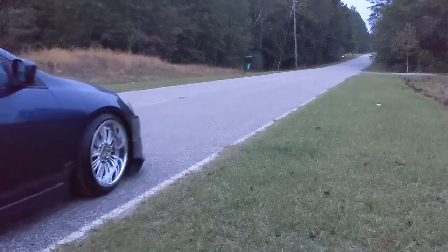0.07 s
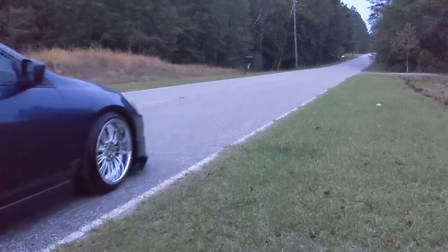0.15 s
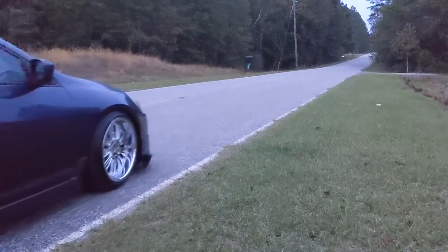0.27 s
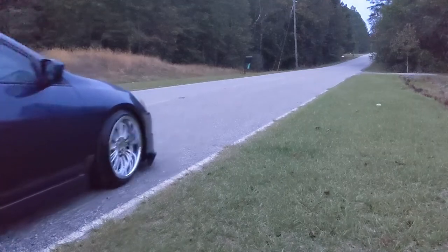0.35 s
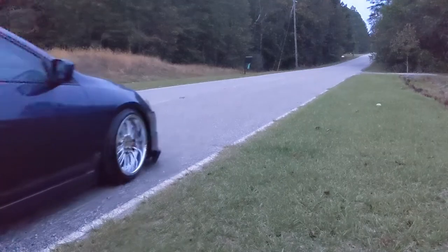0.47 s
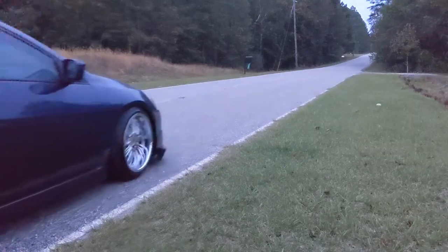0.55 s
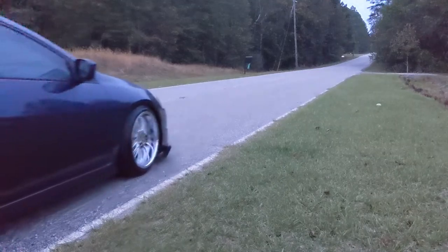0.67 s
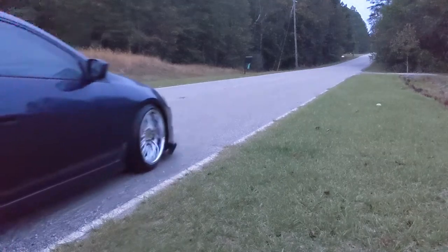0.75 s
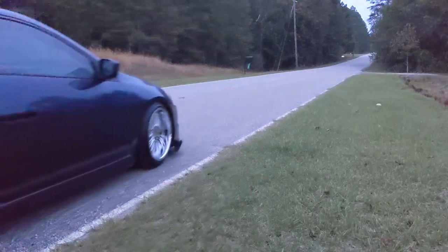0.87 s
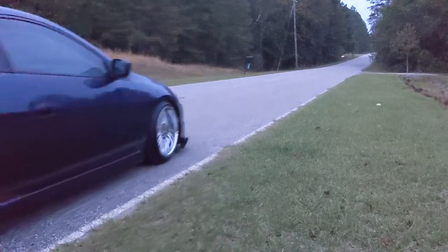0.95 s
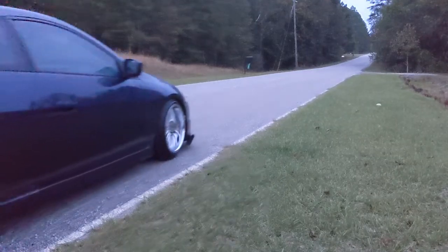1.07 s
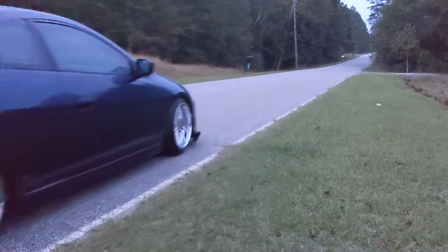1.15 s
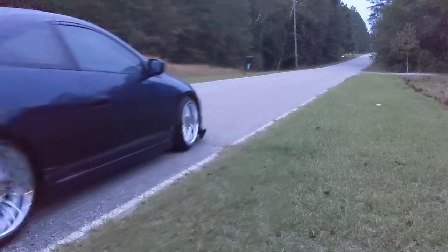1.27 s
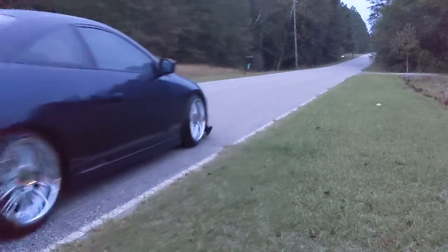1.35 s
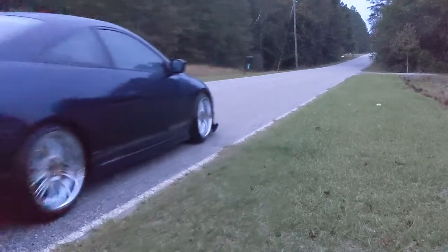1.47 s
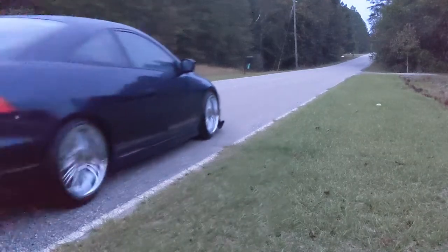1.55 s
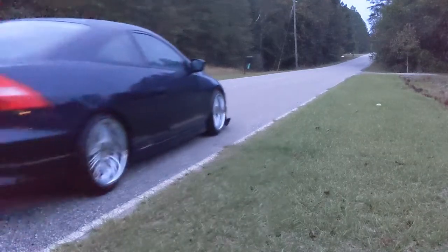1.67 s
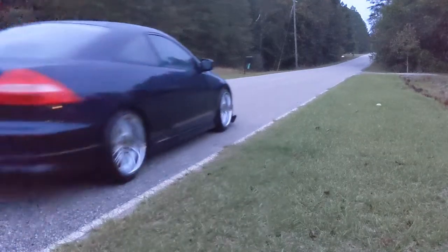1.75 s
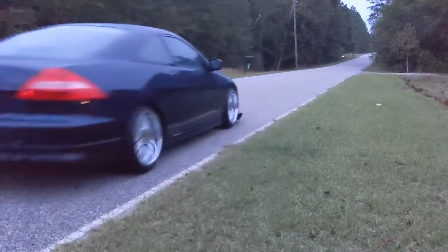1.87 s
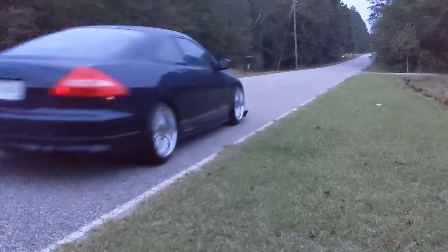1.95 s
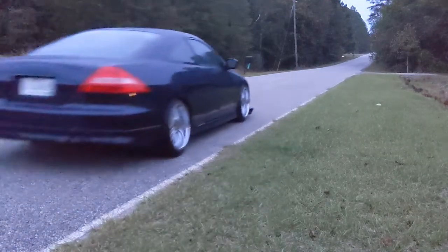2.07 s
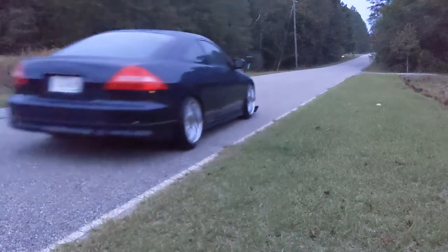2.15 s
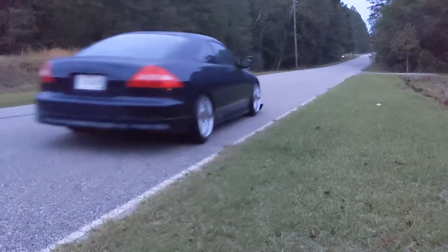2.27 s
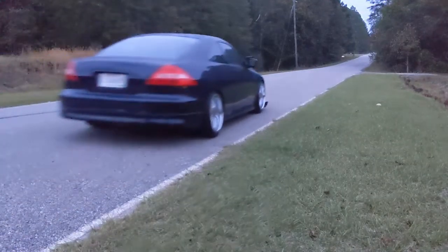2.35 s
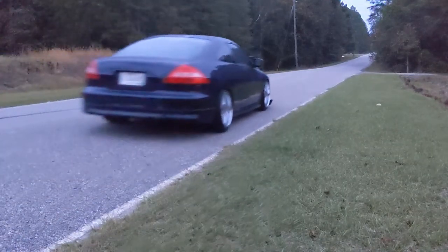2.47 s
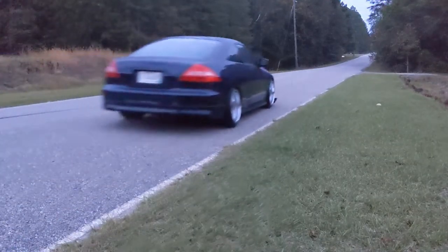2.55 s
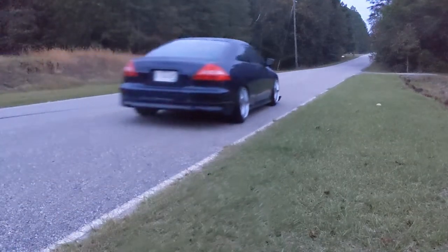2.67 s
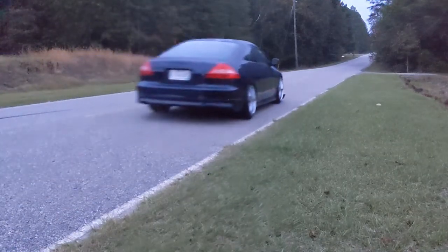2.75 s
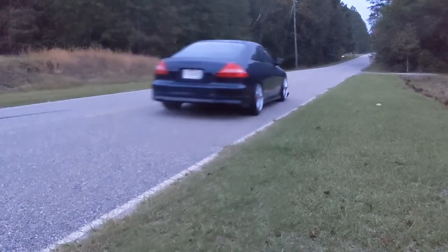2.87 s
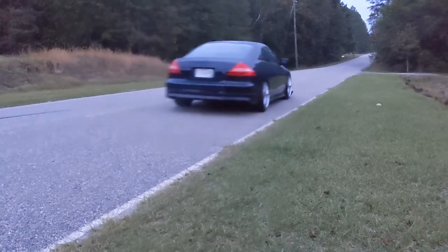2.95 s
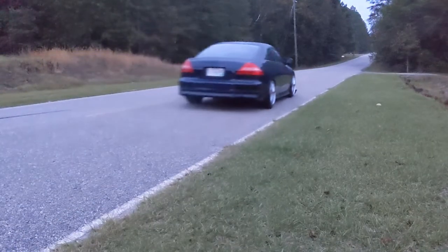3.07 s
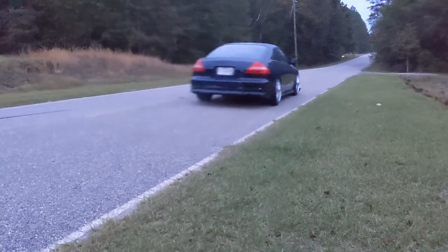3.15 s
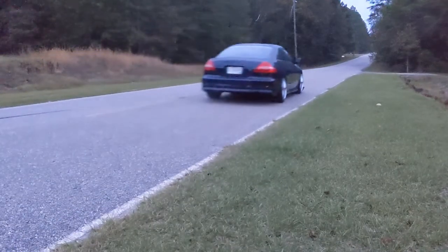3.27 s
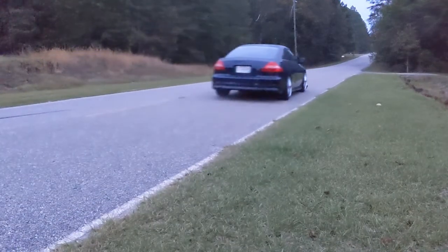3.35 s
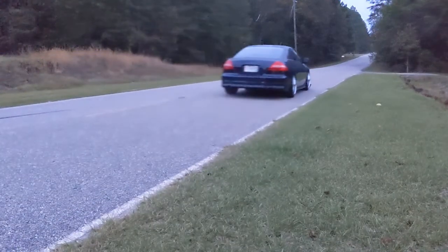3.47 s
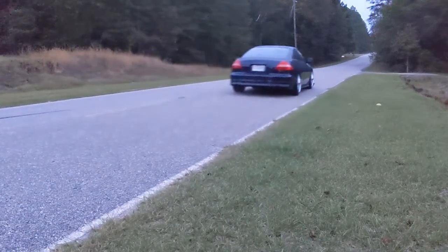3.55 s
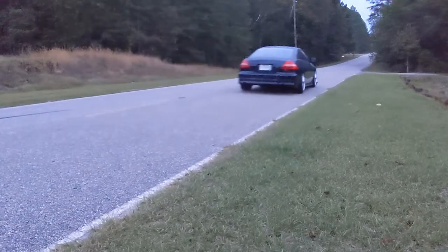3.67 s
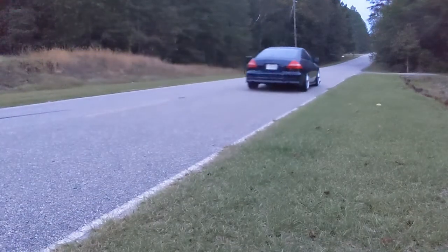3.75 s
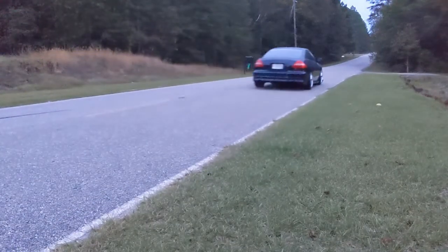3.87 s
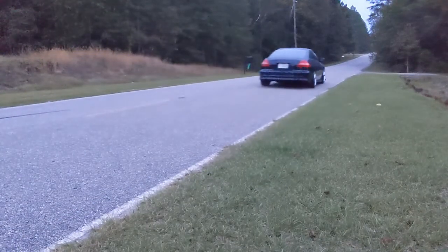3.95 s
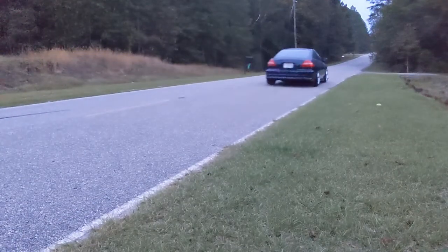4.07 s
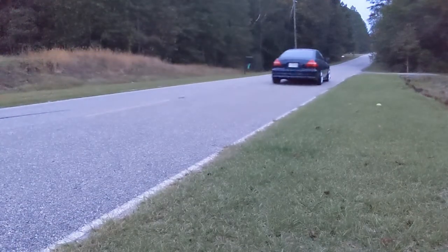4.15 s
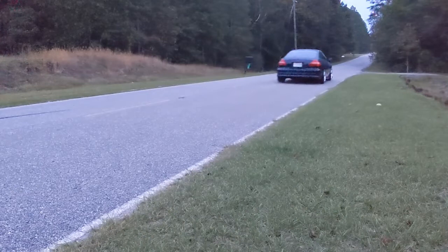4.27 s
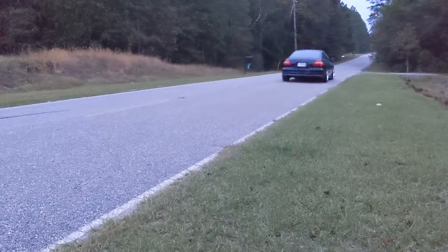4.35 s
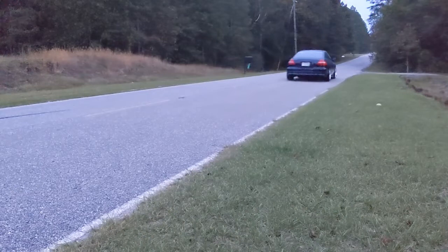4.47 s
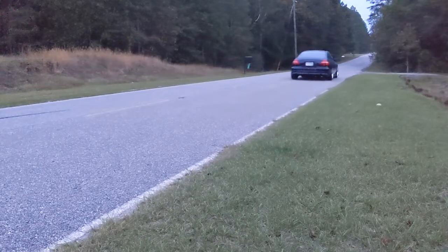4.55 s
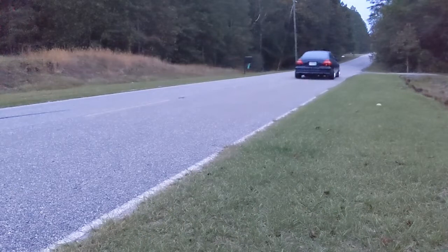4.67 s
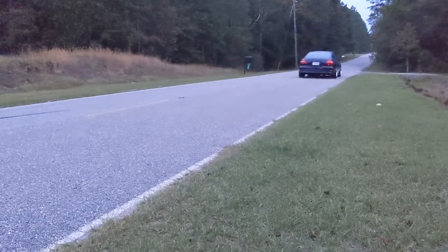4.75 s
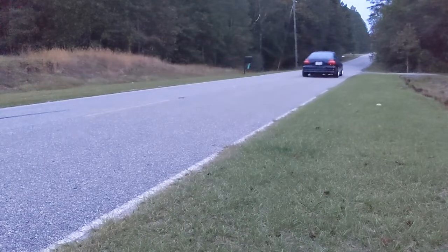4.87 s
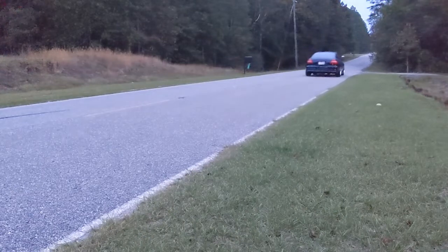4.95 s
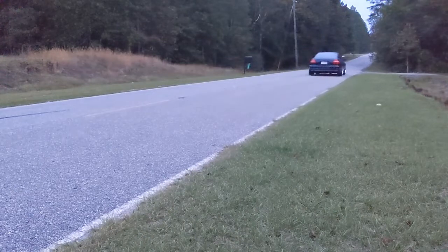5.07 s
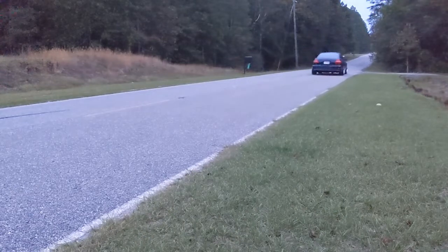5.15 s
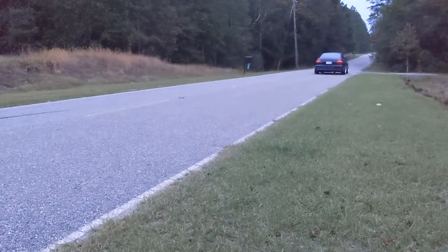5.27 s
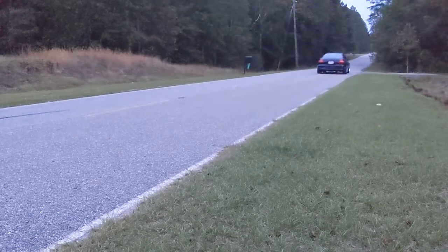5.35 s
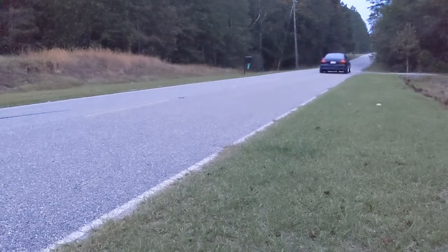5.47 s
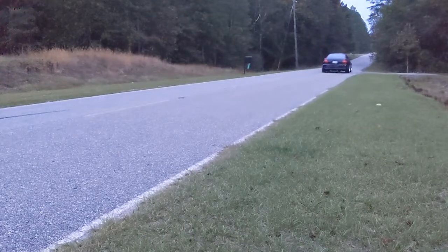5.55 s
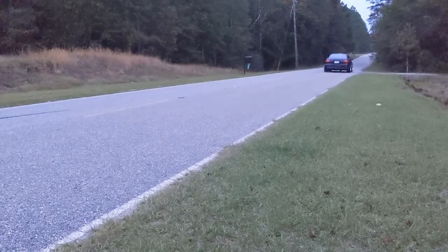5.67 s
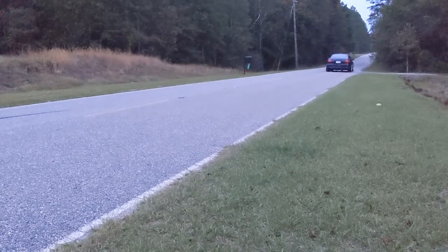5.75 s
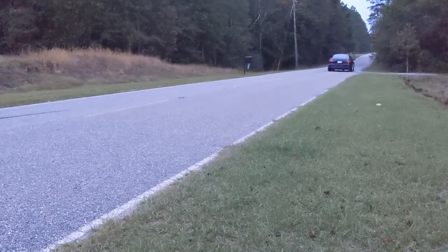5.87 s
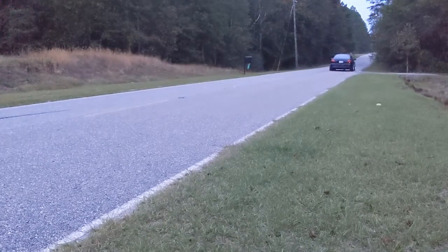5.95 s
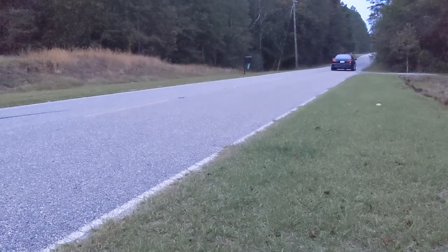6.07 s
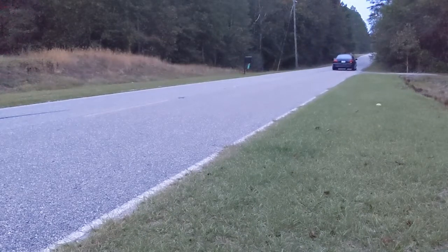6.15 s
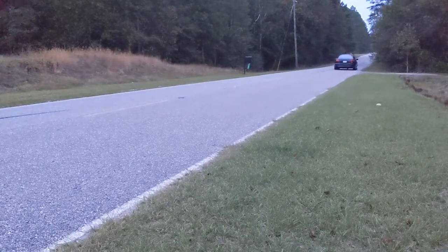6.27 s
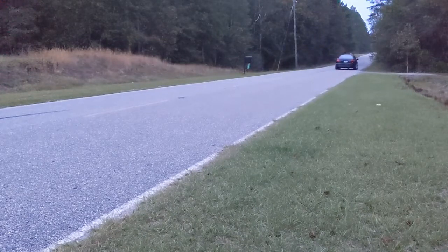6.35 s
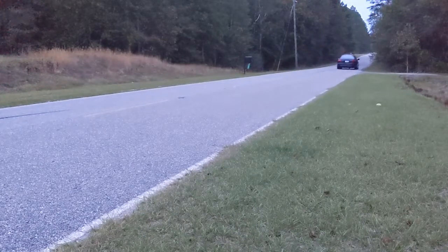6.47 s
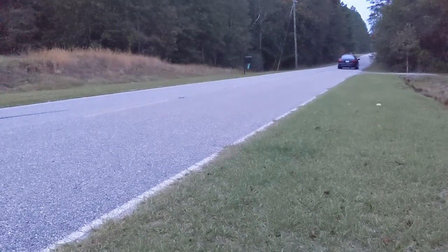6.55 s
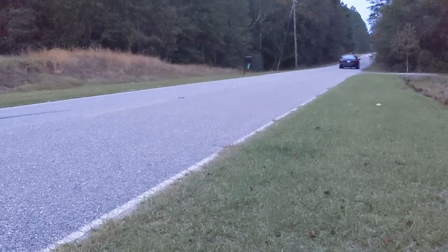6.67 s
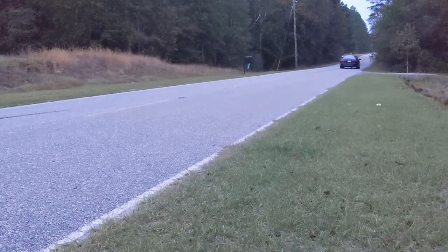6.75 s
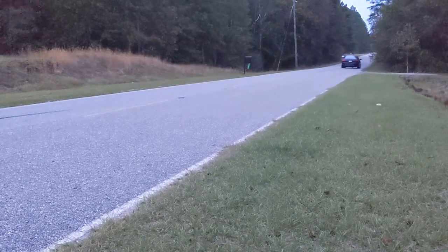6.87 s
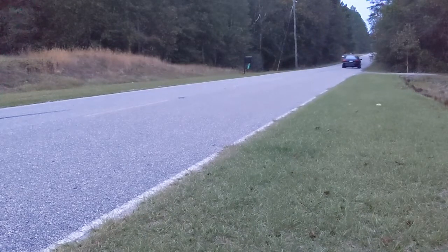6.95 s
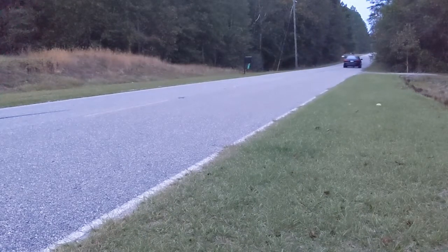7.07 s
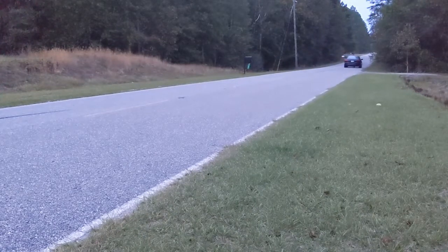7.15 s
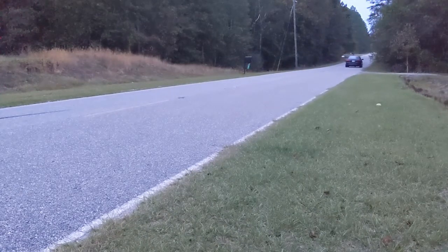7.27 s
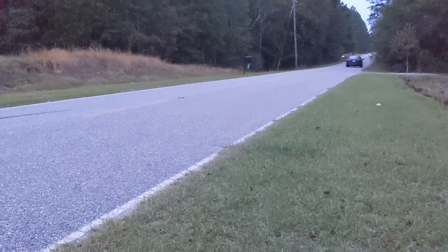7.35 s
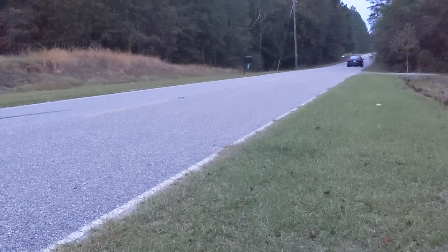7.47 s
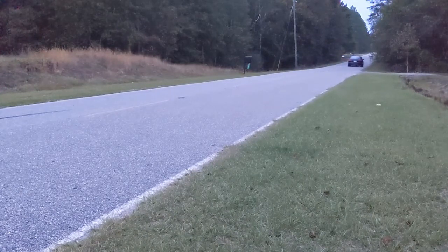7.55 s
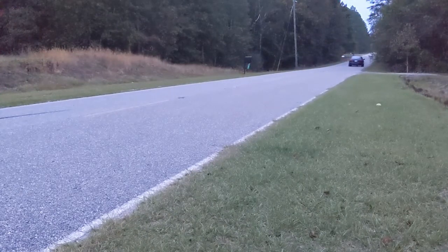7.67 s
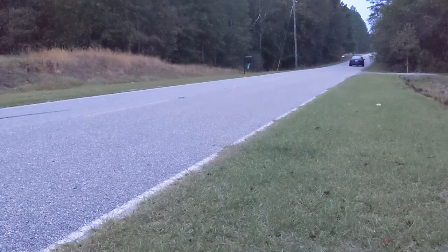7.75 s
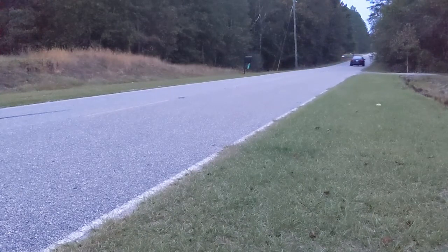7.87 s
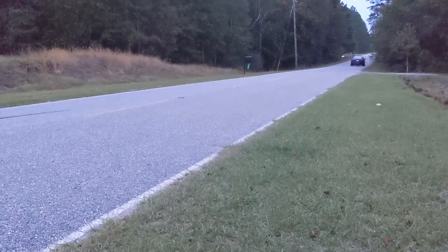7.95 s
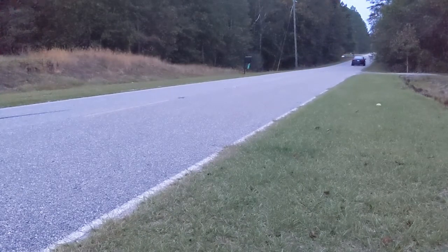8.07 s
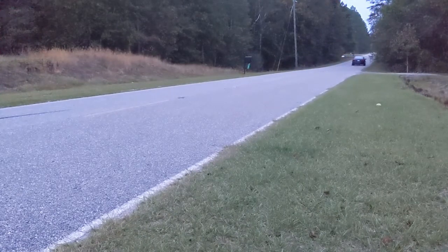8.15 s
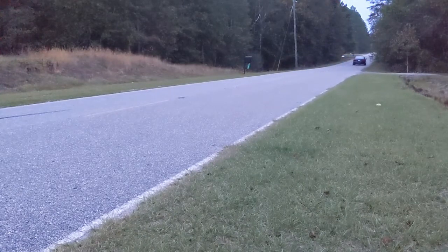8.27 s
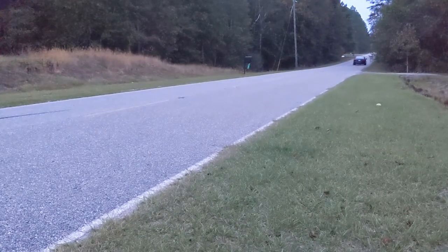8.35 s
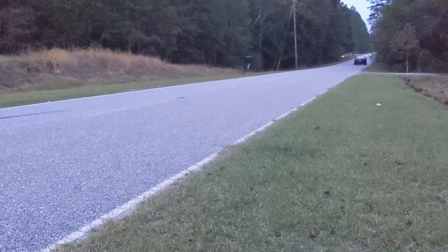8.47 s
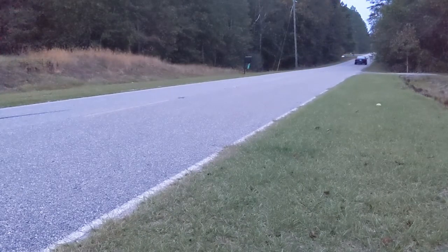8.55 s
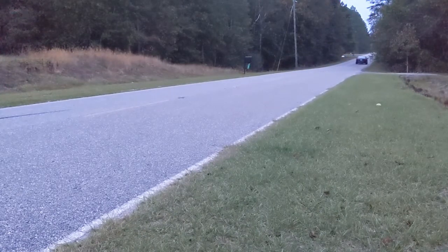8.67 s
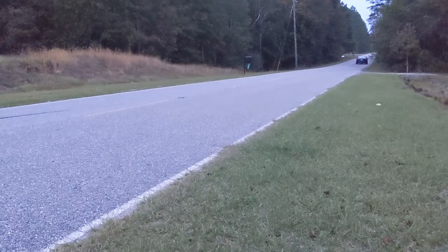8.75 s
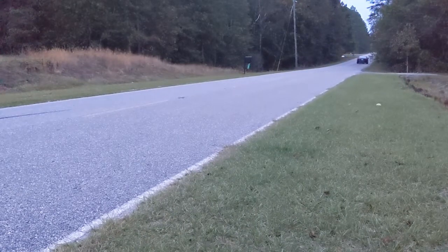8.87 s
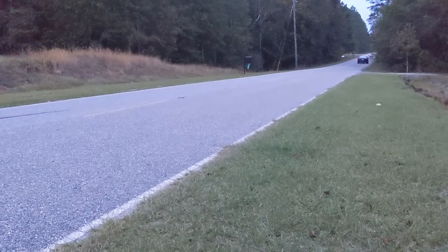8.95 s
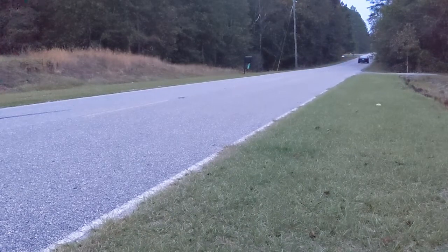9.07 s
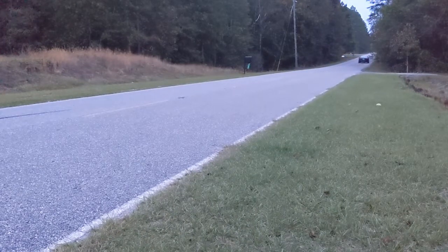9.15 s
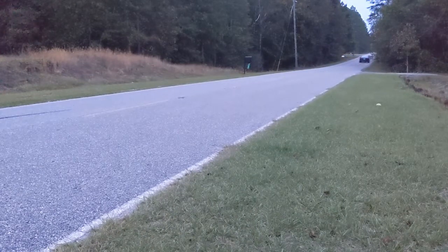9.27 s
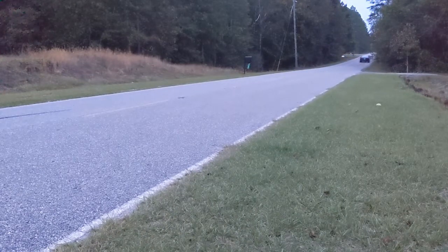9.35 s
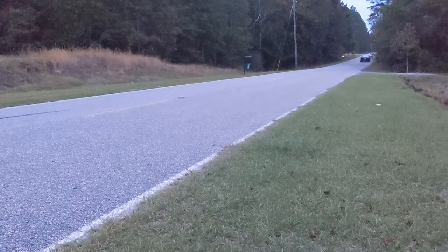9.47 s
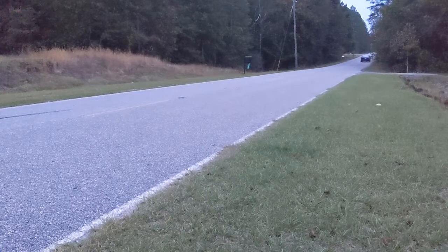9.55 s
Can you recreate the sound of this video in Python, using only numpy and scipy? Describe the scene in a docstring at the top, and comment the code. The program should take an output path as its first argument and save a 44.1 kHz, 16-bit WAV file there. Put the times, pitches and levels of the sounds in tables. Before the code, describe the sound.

A six-cylinder car with a loud, boomy exhaust slips its clutch close by, pulls away hard with metallic rattles, shifts up once and recedes.

```python
"""Six-cylinder car pulling away

A six-cylinder car with a loud exhaust slips its clutch nearby, pulls away down a quiet road and shifts up once.
The boom is a stack of orders of the firing rate; rasp, tyre roar and still woods with faint insects are
shaped noise; loose parts rattle as decaying sines; a few short dry clicks stand out. Two close microphone
ports hear the car swing from the left to just right of ahead."""
import sys
import numpy as np
from scipy import signal
from scipy.fft import rfft, irfft, next_fast_len
from scipy.io import wavfile
from scipy.ndimage import uniform_filter1d

SR = 44100
rng = np.random.default_rng(int(sys.argv[2]) if len(sys.argv) > 2 else 0)


def unload_audio(sound):
    """Save the sound as a 16-bit wav file, at the path given as the first command line argument."""
    columns = np.transpose(np.atleast_2d(sound))
    # keep every value between -1 and 1, then stretch to whole-number steps
    steps = np.round(np.clip(columns, -1, 1) * 32767)
    wavfile.write(sys.argv[1], SR, steps.astype(np.int16))


def ratio_of_db(decibels):
    """Turn decibels (scalar or array-like) into linear amplitude factors; 0 dB maps to 1."""
    return 10 ** (np.asarray(decibels, float) / 20)


N = 423801

# main orders, as multiples of the firing rate
MAIN_ORDERS = [.5, 1, 2, 3, 4, 5, 1.5, 2.5]
# bearing of the car: t/s, lag of the left port/ms
LAG = [(0, -0.17), (.8, -0.13), (1.7, -0.064), (2.7, -0.02), (3.7, 0.041), (5, 0.12), (7, 0.12),
       (9.61, 0.13)]
# modes of the thin exhaust shell: f/Hz, width/Hz, level/dB
SHELL_MODES = [(1690, 210, 3.5), (2050, 77, 8), (2127, 59, 3), (2226, 150, 1), (2420, 190, -1),
               (2632, 130, 1.5), (2880, 250, -3), (3771, 220, 6)]
# the shell under load: t/s, level over the rasp/dB, f around which its modes answer best/Hz
RINGING = [(0, 3, 2690), (1.3, -16, 1690), (2, 8, 1742), (2.2, 6, 2050), (2.5, 13, 2050), (2.6, 2, 2279),
           (2.9, 1, 2304), (3.25, 8.5, 2380), (3.55, 8, 2640), (3.9, 5.5, 2753), (4.15, 5, 2740),
           (4.45, -6, 2660), (5, 6, 2156), (5.5, 5.5, 2291), (6, -1, 2305), (9.61, 2, 2400)]


def evened(x):
    """Scales to rms 1."""
    return x / np.sqrt(np.mean(x ** 2) + 1e-20)


def read(points, hz):
    """Reads a spectrum table on a log-frequency axis."""
    f, value = np.transpose(points)
    return np.interp(np.log(hz + 1), np.log(f + 1), value)


def columns(rows, t):
    """Reads each column of an automation curve at the times t."""
    s, *values = np.transpose(rows)
    return [np.interp(t, s, v) for v in values]


def bump(t, centre_s, half_s):
    """A smooth bell in time, 1 at its centre and 1/e half a length away."""
    return np.exp(-((t - centre_s) / half_s) ** 2)


def wander(t, top_hz):
    """Slow random drift of rms 1: sines up to top_hz, the slower ones stronger."""
    hz = np.geomspace(.3, top_hz, num=12)[:, None]
    coarse = t[::64]
    waves = np.sin(2 * np.pi * (hz * coarse + rng.random(hz.shape))) / np.sqrt(hz)
    return np.interp(t, coarse, evened(waves.sum(0)))


def noise(spectrum, patchy_db, flicker_db, size=512):
    """Random short-time spectra at both ports, partly alike and delayed by the bearing of the car."""
    # f/Hz, likeness of the ports (0 to 1)
    likeness = [(30, 0.72), (100, 0.76), (300, 0.66), (700, 0.83), (1500, 0.77), (3000, 0.59), (7000, 0.35),
                (12000, 0.17)]
    hop = size // 4
    frames = N // hop + 5
    hz = np.fft.rfftfreq(size, 1 / SR)[:, None]
    a, b, c, d, patches = rng.standard_normal((frames, len(hz), 5)).T
    # patches smear over neighbouring bins and frames; flicker moves the whole spectrum at once
    patches = uniform_filter1d(patches, size=6, axis=0)
    patches = evened(uniform_filter1d(patches, size=10240 // size, axis=1))
    flicker = evened(uniform_filter1d(rng.standard_normal(frames), size=4))
    same = np.clip(read(likeness, hz), 0, 1)
    lag_ms, = columns(LAG, np.arange(frames) * hop / SR)
    early = np.exp(2j * np.pi * hz * lag_ms / 1000)
    left = a + 1j * b
    right = same * left * early + np.sqrt(1 - same ** 2) * (c + 1j * d)
    level_db = read(spectrum, hz) + patchy_db * patches + flicker_db * flicker
    z = np.array([left, right]) * ratio_of_db(level_db)
    return evened(signal.istft(z, nperseg=size, noverlap=size - hop)[1][:, :N])


def engine_speed(t):
    """Firing rate in Hz, its corners rounded off."""
    # revs held, dragged down by the clutch, first gear, lift, judder as second gear bites:
    # t/s, firing rate/Hz
    speed = [(0, 66.1), (.13, 71.5), (.3, 70.3), (.55, 68.6), (.8, 57.17), (1.0, 47.67), (1.15, 41.27),
             (1.39, 38.38), (1.6, 44.84), (1.73, 50.77), (1.85, 52.94), (2.06, 59.2), (2.4, 71.58),
             (2.8, 86.9), (3.02, 96.66), (3.3, 111.2), (3.63, 130.2), (4.19, 156.9), (4.78, 184.4),
             (5.34, 213.5), (5.73, 228), (5.95, 222.5), (6.06, 220.2), (6.35, 200), (6.47, 192.4),
             (6.58, 157.5), (6.66, 136), (6.72, 137.7), (6.86, 171.2), (6.94, 160.1), (7.05, 170.1),
             (7.23, 155.7), (7.4, 173.3), (7.5, 170.6), (7.98, 186.2), (8.6, 204.1), (9.61, 236.6)]
    hz, = columns(speed, t)
    return uniform_filter1d(hz, size=1500)


def firings(t, smooth_hz):
    """Slightly unsteady firing rate, and the firings so far at each port."""
    hz = smooth_hz * (1 + 0.0025 * wander(t, 20))
    lag_ms, = columns(LAG, t)
    turns = np.cumsum(hz) / SR + np.array([[-.5], [.5]]) * hz * lag_ms / 1000
    return hz, turns


def close_db(t, hz):
    """Extra hollows in the exhaust colour while the car is close, at a moving pitch."""
    # deepens the dip near 200 Hz: f/Hz, level/dB
    close = [(40, -2.5), (60, -8), (100, 0), (150, 4.5), (186, -5), (197, -12), (207, 4), (240, 2),
             (290, 4.5), (325, 0), (350, -9), (400, -5.5), (450, 1), (520, -3), (660, -1), (780, -20),
             (950, -37.5)]
    until_s, gone_s = 1.7, 3.88
    return np.interp(t, [until_s, gone_s], [1, 0]) * read(close, hz)


def main_order_levels(t, hz):
    """Levels in dB of the main orders: engine load, tailpipe colour and slow swells."""
    # t/s, level of the boom/dB, fall of the upper orders/(dB per octave)
    boom = [(0.0, -20, -10.5), (0.12, -19, -10), (0.3, -21.5, -9), (0.55, -20, -10.5), (0.7, -27.5, -5.5),
            (0.9, -28, -8), (1.15, -23.5, -7.5), (1.45, -17.5, -10.5), (1.8, -19.5, -9), (2.1, -20, -7),
            (2.4, -24.5, -5), (2.8, -23, -6.5), (3.15, -17.5, -10), (3.4, -20, -16), (3.65, -19.5, -13.5),
            (4.0, -24.5, -9), (4.35, -26.5, -6.5), (5.2, -26, -7.5), (5.6, -31, -2), (5.8, -36.5, -2.5),
            (5.92, -33.5, -8.5), (5.96, -40.5, -11), (6.1, -43, -5.5), (6.35, -37.5, -2.5),
            (6.5, -42.51, -14), (6.6, -38, -6.5), (6.75, -32.5, -7.5), (6.95, -33.5, -7), (7.5, -33.5, -8),
            (8.1, -33.5, -5), (8.6, -30.5, -10), (9.1, -32.5, -5), (9.61, -36.5, -5)]
    # what the tailpipe passes, with a dip near 200 Hz and a cliff over 330 Hz: f/Hz, level/dB
    tailpipe = [(30, -24), (45, -13.5), (70, -4.5), (100, -4.5), (140, -0.5), (175, 6.5), (190, 1.2),
                (198, -3), (208, 2), (230, 2.1), (280, 0.26), (320, 3), (350, -4.5), (400, -5.5),
                (440, -14), (490, -10), (560, -6.5), (650, -25), (820, -25.5), (930, -28.5), (1200, -26)]
    # own level of each order 1 to 5: level/dB
    own_levels = [-0.0043, -0.83, 0.25, -0.86, -2.2]
    # half order, where the two banks differ: t/s, level/dB
    half = [(0, -59), (1.0, -55), (1.35, -68), (1.8, -58), (3.7, -62), (4.5, -50.5), (5.2, -42),
            (5.6, -48.5), (5.9, -57.5), (6.2, -50), (6.5, -52), (6.68, -75), (6.9, -50.5), (7.25, -59.5),
            (7.45, -54.5), (8.4, -49), (9.61, -47.5)]
    # orders 2 to 5 swell and dip, each in its own way:
    # t/s, order 2/dB, order 3/dB, order 4/dB, order 5/dB
    swells = [(.5, 0, 0, 0, 0), (.72, 1, -6, 5, -1.5), (.95, -0.5, 0, 3, 4), (1.2, 1, 0.5, 2.5, -1),
              (1.8, 0, 1, -2, -1.5), (2.3, 1.5, -1, 2.5, -4), (2.6, -1, -2.5, 2.5, -11),
              (2.88, 3, 2.5, -4, -13), (3.15, 0, -1.5, 4, -2), (3.4, 2, -4.5, 9, -3), (3.65, 0, 5, -3, 4),
              (3.9, 1.5, 4, 3.5, 7), (4.2, -1, -6, 1, 9.5), (4.5, 1, -7, 0, 10.5),
              (4.63, 2.5, -19.5, 6.5, 3), (4.75, -1.5, 3, 9.5, -6), (4.95, -1, 3, -3, 0),
              (5.08, -2, -4.5, 2.5, 0), (5.3, 2, 2, -2, -7.5), (5.6, -0.5, 3.5, -6, -3),
              (5.9, -2, 1, 5, 10.5), (6.2, 0.5, -6, -1, 6), (6.6, 3, -13, -6, -7), (6.9, 3.5, -1, -4, 7),
              (7.2, -0.5, -4.5, 6, 11), (7.6, 1.5, -0.5, -1, -5), (8.1, -4, 2, -6, 4.5),
              (8.4, -4.5, 2.5, 5, 3), (8.62, -2.5, 1, -7, 0), (8.85, 4.5, 5, 2.5, -4),
              (9.15, -2.5, -1.5, -4, 4), (9.61, 2, -9, 10, 1)]
    # where the two banks differ: t/s, level of order 1.5/dB, level of order 2.5/dB
    banks = [(0, -50, -52), (.3, -51, -57), (.75, -55, -49), (1.2, -48, -46), (1.75, -48, -43),
             (2, -51, -45), (2.3, -47, -44), (2.6, -46, -46), (2.9, -41, -41), (3.2, -40, -44),
             (3.55, -47, -52), (3.85, -43, -65), (4.15, -54, -68), (4.6, -48, -63), (4.9, -46, -61),
             (5.1, -49, -67), (5.35, -54, -59), (5.8, -52, -67), (6.1, -61, -74), (6.4, -54, -64),
             (6.65, -58, -68), (6.9, -52, -68), (7.15, -56, -75), (7.4, -51, -65), (7.65, -57, -62),
             (8.1, -51, -60), (8.4, -50, -58), (8.6, -57, -61), (8.9, -60, -59), (9.2, -57, -65),
             (9.61, -58, -66)]
    # the tailpipe colour sinks in pitch by a share as the car draws away
    sink_share, sink_from_s, sink_s = 0.074, 1.03, 2.43
    sink = 1 + sink_share * np.clip((t - sink_from_s) / sink_s, 0, 1)
    boom_db, fall_db = columns(boom, t)
    whole = []
    for k, own_db in zip(MAIN_ORDERS[1:], own_levels):
        colour_db = read(tailpipe, k * hz * sink) + close_db(t, k * hz)
        whole.append(boom_db + own_db + fall_db * np.log2(k) + colour_db)
    upper = [db + swell_db for db, swell_db in zip(whole[1:], columns(swells, t))]
    return columns(half, t) + whole[:1] + upper + columns(banks, t)


def lope(turns):
    """One cylinder is louder, so the growl lopes once in six firings: gain in dB."""
    lope_db, place_in_cycle = 3.5, .28
    return lope_db * np.cos(2 * np.pi * (turns[0] / 6 - place_in_cycle))


def firing_order(t, hz, turns, k, db, start=0):
    """One order k of the firing rate, delayed by the pipe resonance: a dip in pressure that rings."""
    # the pulses lean forward while the clutch drags the engine:
    # t/s, lead of every order/cycles, share of the pipe's ringing, extra lead around turn_hz/cycles
    lean_curve = [(0, -.1, .3, .25), (.6, -.05, .3, .25), (1.1, .22, .2, .3), (1.5, .2, .2, .2),
                  (1.7, .15, .2, 0), (2.9, .15, .3, 0), (3.5, 0, 1, 0)]
    turn_hz, turn_width_hz = 215, 25
    lope_from_hz = 330
    lean, ringing, turn = columns(lean_curve, t)
    u = k * hz / 270  # pitch relative to the resonance
    late = 1.755 * ringing * np.arctan2(u / 4.6, 1 - u ** 2)
    lead = start + lean + turn * np.exp(-((k * hz - turn_hz) / turn_width_hz) ** 2)
    db = db + lope(turns) * np.clip((k * hz - lope_from_hz) / 40, 0, 1)
    return -np.sqrt(2) * ratio_of_db(db) * np.cos(2 * np.pi * (k * turns + lead) - late)


def weak_orders(t, hz, turns):
    """Upper whole orders, half orders from unequal banks, sixth orders from unequal cylinders."""
    # unevenness of the gas flow: t/s, level/dB
    gas = [(0, -35), (.6, -36), (1.2, -46.5), (1.8, -40.5), (2.5, -32), (3.2, -37.5), (3.45, -41.5),
           (3.7, -46), (4.3, -48.5), (5, -49), (5.6, -52.5), (6, -54), (6.5, -50), (6.9, -53), (7.6, -52.5),
           (8.4, -53), (9.61, -47)]
    # what the pipe passes of the weaker orders: f/Hz, level/dB
    pipe = [(20, -37), (60, -14), (150, -4.5), (300, -4.5), (340, -19), (400, -20), (460, -15.5),
            (540, -29), (620, -40), (720, -24), (850, -24), (940, -29), (1150, -21), (1400, -25),
            (1800, -50)]
    # order 7/6 stands out in second gear: t/s, level/dB
    sixth = [(6.5, -1), (6.9, 5), (7.15, 2), (7.6, 5), (8.15, 7), (8.6, 21), (9, 4.5), (9.61, 7)]
    gas_db, = columns(gas, t)
    # the upper orders stand out while the revs are held
    upper_db = 6 + 4 * np.clip((.75 - t) / 0.24, 0, 1)
    # the banks are more alike until the clutch has bitten, and differ most in the hard pull in first gear
    bank_db = 5 - 6 * np.clip(2.2 - t, 0, 1) + 5 * bump(t, 3.3, 0.23)
    # cylinders differ more at speed
    cylinder_db = -2 - 14 * np.clip(1 - hz / 150, 0, 1) / 1.3
    whole = np.arange(6, 14)
    halves = np.arange(3.5, 8)
    sixths = np.array([n / 6 for n in range(1, 18) if n % 3])
    families = (whole, upper_db, .9), (halves, bank_db, 1.8), (sixths, cylinder_db, 6.0)
    out = 0
    for orders, kind_db, fall_db in families:
        for k in orders:
            level_db = gas_db + kind_db - fall_db * abs(k - 1) + read(pipe, k * hz) + close_db(t, k * hz)
            if k == 7 / 6:
                level_db = level_db + columns(sixth, t)[0]
            level_db = level_db + np.clip(hz / 35, 1.5, 4) * wander(t, 6)
            start = rng.random() * (k % 1 > 0)  # orders between the whole ones start anywhere
            out = out + firing_order(t, hz, turns, k, level_db, start)
    return out


def turbulence(t, turns):
    """Turbulent gas rumbles in the pipe, in puffs with the firings."""
    # f/Hz, level/(dB per Hz)
    rumble = [(20, -20), (60, -12), (150, -1.5), (300, 6), (350, 2), (410, -4), (455, -3.5), (520, -8),
              (620, -33), (720, -21.5), (900, -33.5), (3000, -78.5)]
    # t/s, level/dB
    levels = [(0, -43), (.6, -44), (1.2, -53), (1.8, -51), (2.5, -47), (3.1, -44), (3.5, -45), (3.7, -51),
              (4.3, -55), (5.6, -55), (6, -56), (6.5, -60), (6.9, -62), (8.4, -60), (9.61, -59)]
    gusts = evened(1 - .5 * np.cos(2 * np.pi * turns - 2.5))
    level_db = columns(levels, t)[0] + lope(turns) / 2
    return ratio_of_db(level_db) * gusts * noise(rumble, 1.6, 1.1, size=2048)


def exhaust(t, hz, turns, order_db):
    """Main orders, weak orders between and above them, and gas rumble, all ducked by the throttle."""
    # the throttle shuts for the shift
    lift_s, lift_half_s, lift_db = 6.012, .026, -16
    # the boom flutters around the lift
    dip_s, spell_s, flutter_hz, flutter_db = 6.08, 0.11, 21.5, 3.24
    spell = np.exp(-((t - dip_s) / spell_s) ** 4)
    flutter = -flutter_db * spell * np.cos(2 * np.pi * flutter_hz * (t - dip_s))
    out = weak_orders(t, hz, turns) + turbulence(t, turns)
    for k, db in zip(MAIN_ORDERS, order_db):
        unsteady_db = (.6 + .3 * abs(k - 1)) * wander(t, 30)
        out = out + firing_order(t, hz, turns, k, db + unsteady_db)
    return ratio_of_db(flutter + lift_db * bump(t, lift_s, lift_half_s)) * out


def scrub(t):
    """The tyres scrub as second gear bites: a brief swell from 0 to 1."""
    return bump(t, 6.94, 0.052)


def resonate(x, hz, width):
    """A steep resonance of gain 1: two equal peak filters in a row."""
    peak = signal.iirpeak(hz, hz / width, SR)
    return signal.lfilter(*peak, signal.lfilter(*peak, x))


def shell(t, drive):
    """Gas and jolts keep the shell modes singing, each swelling on its own."""
    ringing_db, centre_hz = columns(RINGING, t)
    out = 0
    for hz, width, db in SHELL_MODES:
        swell_db = 3 * wander(t, 3.7)
        mode_db = ringing_db + db - 7 * abs(hz - centre_hz) / 500 + swell_db
        out = out + ratio_of_db(mode_db) * resonate(drive, hz, width)
    return out


def rasp(t, turns):
    """Gas rasps out in a decaying puff at each firing, of uneven strength, and sings in the shell."""
    # f/Hz, level/(dB per Hz)
    spectrum = [(1100, -25.5), (1600, -14.5), (2100, -1), (2800, 1.5), (3500, -2.5), (4200, -9),
                (6000, -43), (12000, -84)]
    # t/s, level/dB
    levels = [(0, -61), (.64, -62), (.8, -65), (1.45, -65), (2.101, -64), (2.5, -57.5), (2.9, -56),
              (3.9, -57), (5.1, -57), (5.6, -59), (6.25, -62.5), (6.72, -74), (6.83, -58), (7.08, -60),
              (7.22, -69), (7.45, -62), (8.2, -61.5), (9.61, -56.5)]
    firing = np.maximum(turns, 0).astype(int)
    chance = np.clip(rng.standard_normal(4000), -2, 2)[firing]
    puffs = 1.0 + ratio_of_db(2.0 * chance[0]) * np.exp(-(turns[0] % 1) / 0.28)
    gas = evened(uniform_filter1d(puffs, size=30)) * noise(spectrum, 1.5, 0.66)
    knocks = evened(ratio_of_db(4.8 * chance) * (np.diff(firing, prepend=0) > 0))  # one jolt at each firing
    metal = shell(t, 0.77 * gas + 1.2 * knocks)
    return ratio_of_db(columns(levels, t)[0] + 2.7 * scrub(t)) * (gas + metal)


def treble(t):
    """Hiss and sizzle of the gas, fading with distance and sagging when the revs drop."""
    # f/Hz, level/(dB per Hz)
    hiss_spectrum = [(2800, -25.5), (3800, -5), (4400, -1), (5200, -4.5), (6200, -5.5), (7300, -11),
                     (8500, -21), (11000, -46.5), (15000, -86.5)]
    # f/Hz, level/(dB per Hz)
    sizzle_spectrum = [(6500, -27), (8000, -5.5), (10000, 1), (11800, -5), (13000, -11.5), (14200, -32.5),
                       (16500, -61)]
    # t/s, sizzle level/dB
    levels = [(0, -65), (.64, -66.5), (1.3, -68.5), (2.0, -61.5), (2.4, -65.5), (3.3, -65), (4.7, -70.5),
              (5.6, -68.5), (6.249, -71), (6.73, -83.5), (6.85, -75), (7.08, -73), (7.2, -86),
              (7.45, -78.5), (9.61, -81.5)]
    sizzle_db = columns(levels, t)[0] + 6.8 * scrub(t)
    hiss_db = -63.5 + 0.5 * (sizzle_db - levels[0][1])  # hiss follows half of the sizzle's change
    hiss = ratio_of_db(hiss_db) * noise(hiss_spectrum, 1.7, 1.2)
    return hiss + ratio_of_db(sizzle_db) * noise(sizzle_spectrum, 2.1, 1.4)


def tyre_roar(t):
    """Tyre roar, jolting as the driveline takes up its slack."""
    # f/Hz, level/(dB per Hz)
    spectrum = [(300, -15), (500, -8.5), (800, -3), (1300, -4), (1700, -7.5), (2200, -13), (4000, -32.5),
                (12000, -80)]
    # t/s, level/dB
    levels = [(0, -58), (.64, -57.5), (1.301, -64), (1.7, -56.5), (2.8, -57.5), (4.8, -56), (6.6, -56),
              (8.3, -54.5), (9.61, -52.5)]
    # sudden onsets that decay: t/s, level over the roar/dB
    jolts = [(6.843, 5), (6.945, 11), (6.965, 12), (7.076, 8)]
    jolt_decay_s = .007
    roar_db = columns(levels, t)[0] + 2.9 * scrub(t)
    roar_db = roar_db + sum(db * (t > s) * np.exp(-abs(t - s) / jolt_decay_s) for s, db in jolts)
    return ratio_of_db(roar_db) * noise(spectrum, 1.5, 0.3)


def squeal(t):
    """A thin, rough whistle of rubber: noise through a steep resonance."""
    # from t/s, to t/s
    spells = [(6.86, 7.02), (7.38, 7.55)]
    # one for each spell: level/dB
    levels = [-64, -66]
    swell = 0
    for (a, b), db in zip(spells, levels):
        arch = np.clip(4 * (t - a) * (b - t) / (b - a) ** 2, 0, 1)
        swell = swell + ratio_of_db(db) * np.sqrt(arch)
    return swell * evened(resonate(rng.standard_normal(N), 2473, 100))


def chatter(t, turns):
    """Rows of lesser rattles set off by chance firings, near the pitch at which the shell answers best."""
    first_s, last_s, first_db, last_db = 2.52, 3.1, -51, -55
    share_of_firings, spread_db, spread_hz = 0.35, 2, 160
    s = t[1:][np.diff(np.floor(turns[0])) > 0][:300]
    pick, loud, pitch = rng.random((300, 3)).T[:, :len(s)]
    db = np.interp(s, [first_s, last_s], [first_db, last_db]) + spread_db * (2 * loud - 1)
    hz = columns(RINGING, s)[1] + spread_hz * (2 * pitch - 1)
    chosen = (pick < share_of_firings) & (s > first_s) & (s < last_s)
    return list(np.transpose([s, db, hz])[chosen])


def rattles(t, turns):
    """Each knock cracks, then rings in the shell modes nearest its centre."""
    # clearest rattles of the shell under load: t/s, peak level ahead of the port gains/dB, centre f/Hz
    clear = [(1.0983, -44, 2780), (1.4567, -41.5, 1682), (1.5059, -51, 1680), (1.5545, -40.5, 1690),
             (1.5982, -46, 1672), (1.6426, -47, 1720), (1.685, -47, 1680), (1.7253, -42, 1894),
             (1.7633, -47, 1690), (1.7832, -48, 1690), (1.84, -36.5, 1712), (1.876, -44, 2000),
             (1.894, -44, 1690), (1.9494, -45, 1720), (2.0192, -44, 1690), (2.054, -38.5, 1790),
             (2.0915, -55, 1690), (2.1508, -42.5, 2048), (2.1798, -45, 1900), (2.2422, -40, 1765),
             (2.301, -44, 2090), (2.316, -41, 1998), (2.3719, -50, 2102), (2.3863, -41, 2018),
             (2.4141, -41, 2050), (2.4403, -40, 2050), (2.4687, -46, 2020), (2.4951, -42, 2072),
             (2.5085, -41, 2050), (2.5724, -47, 2050), (2.6099, -43, 2032), (2.6601, -43, 2196),
             (2.6972, -48, 2120), (2.7191, -47, 2200), (2.7671, -43, 2200), (2.8134, -47, 2350)]
    out = np.zeros(N + SR)
    age = np.arange(SR // 20) / SR
    starts = rng.random((320, len(SHELL_MODES)))
    for (s, db, centre_hz), start in zip(clear + chatter(t, turns), starts):
        knock = 0.66 * np.exp(-age / 0.001) * np.sin(2 * np.pi * 0.96 * centre_hz * age)  # the crack
        for (hz, width, _), phase in zip(SHELL_MODES, start):
            ring = np.exp(-np.pi * 1.1 * width * age) * np.sin(2 * np.pi * (hz * age + phase))
            knock += ratio_of_db(-22 * abs(hz - centre_hz) / 400) * ring
        knock *= 1 - np.exp(-age / 0.00019)
        out[round(s * SR):][:len(age)] += ratio_of_db(db) * knock / abs(knock).max()
    return out[:N] * ratio_of_db([[-1.5], [-3.5]])  # left, right


def clicks():
    """Short dry clicks: a small step in pressure that leaks away at once."""
    # t/s, level/dB
    rows = [(1.9366, -37), (2.049, -38.5), (2.8988, -39), (3.7905, -45), (5.6404, -29), (6.232, -43)]
    out = np.zeros(N + SR)
    age = np.arange(SR // 20) / SR
    step = np.exp(-age / 0.002) * (1 - age / .0026) * (1 - np.exp(-age / .000012))
    for s, db in rows:
        out[round(s * SR):][:len(age)] += ratio_of_db(db) * step
    return out[:N]


def woods():
    """Still air and faint insects: two beds of noise, the insects in narrow bands."""
    # f/Hz, level/(dB per Hz)
    air = [(12, -23), (40, -1), (100, 0), (300, 5), (1000, -27), (4000, -24.5), (9000, -35), (13000, -73)]
    # f/Hz, level/(dB per Hz)
    insects = [(3900, -35), (4250, -5.5), (4370, 0.5), (4500, -9), (5000, -31), (5800, -21.5), (6100, -4.5),
               (6400, -30), (7500, -68.5)]
    return ratio_of_db(-52.5) * noise(air, 2.4, 0.55) + ratio_of_db(-79) * noise(insects, 2.0, 2.5)


def scene():
    """The car and a few dry clicks over the still air of the woods and faint insects."""
    t = np.arange(N) / SR
    smooth_hz = engine_speed(t)
    order_db = main_order_levels(t, smooth_hz)
    hz, turns = firings(t, smooth_hz)
    car = exhaust(t, hz, turns, order_db) + rasp(t, turns) + treble(t) + tyre_roar(t) + squeal(t)
    return car + rattles(t, turns) + clicks() + woods()


def low_pass(x):
    """Removes everything above the highest recorded frequency."""
    return signal.sosfilt(signal.butter(12, 16510, fs=SR, output="sos"), x)


def record(dry):
    """The two ports differ slightly in colour; the sound starts with a short fade-in."""
    # f/Hz, left over right/dB
    balance = [(30, 2.7), (100, 1.18), (250, 1.17), (550, 1), (1650, 1), (4970, 1.5), (9000, 1.5),
               (13000, -5)]
    size = next_fast_len(N)
    tilt_db = read(balance, np.fft.rfftfreq(size, 1 / SR)) / 2
    ports = irfft(rfft(dry, size) * ratio_of_db([tilt_db, -tilt_db]), size)[:, :N]
    fade_in = np.minimum(np.arange(N) / (.004 * SR), 1)
    return low_pass(ports * fade_in)


dry = scene()
out = record(dry)
unload_audio(out)
```